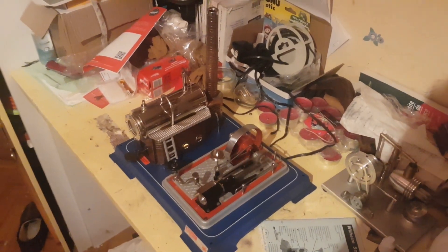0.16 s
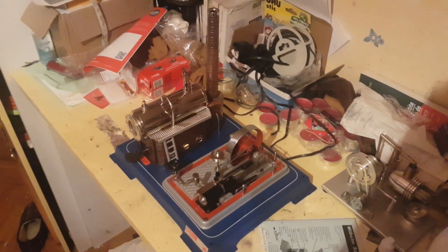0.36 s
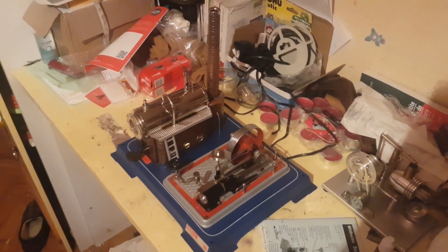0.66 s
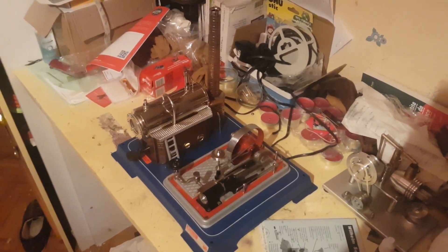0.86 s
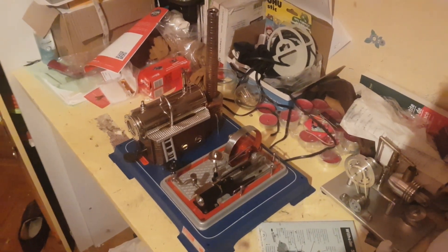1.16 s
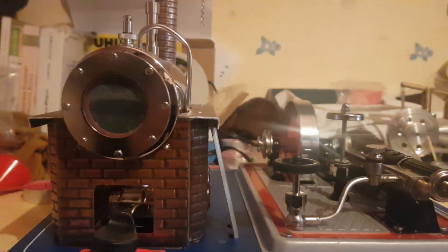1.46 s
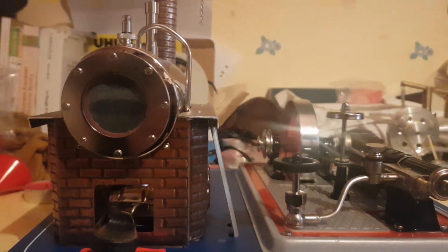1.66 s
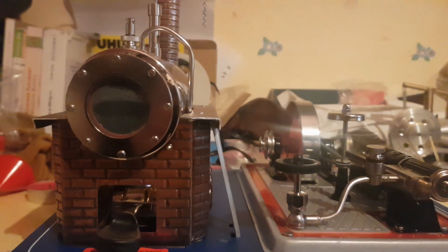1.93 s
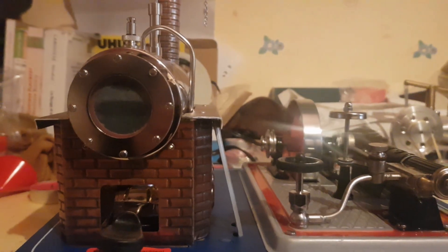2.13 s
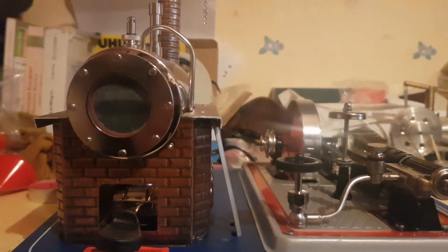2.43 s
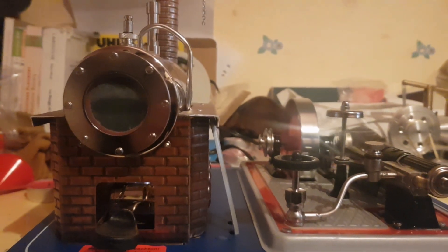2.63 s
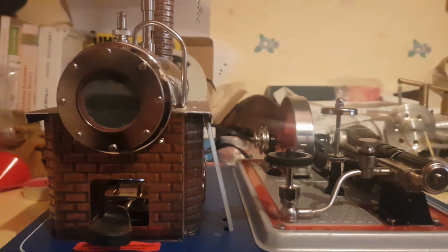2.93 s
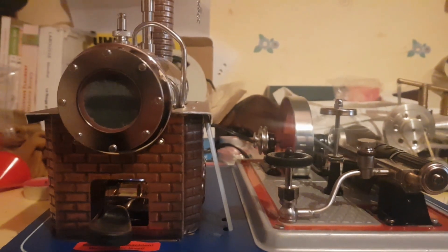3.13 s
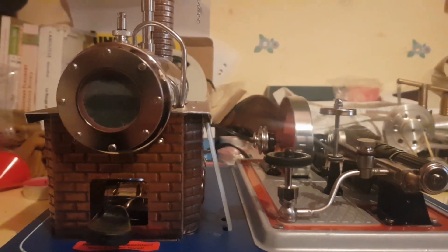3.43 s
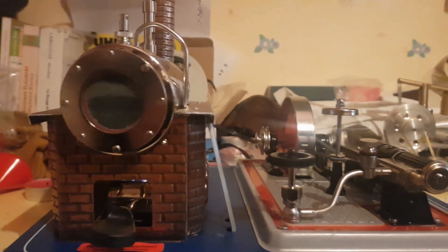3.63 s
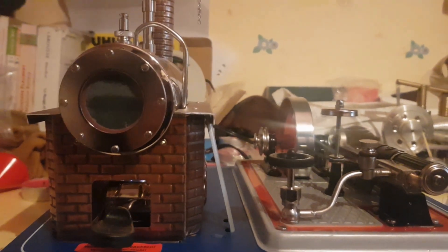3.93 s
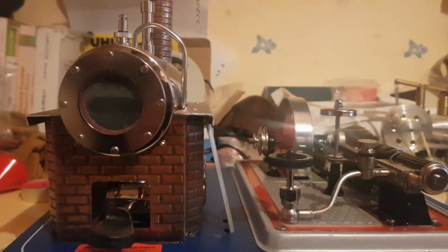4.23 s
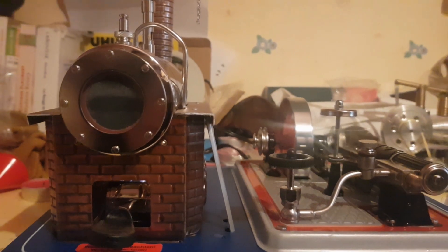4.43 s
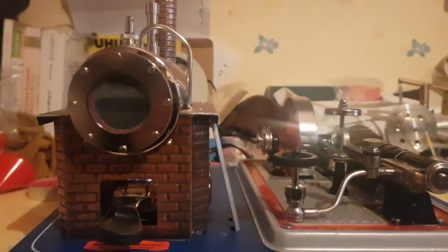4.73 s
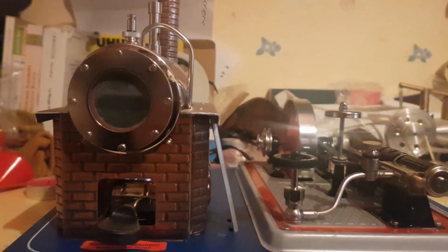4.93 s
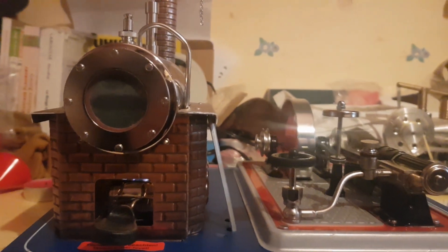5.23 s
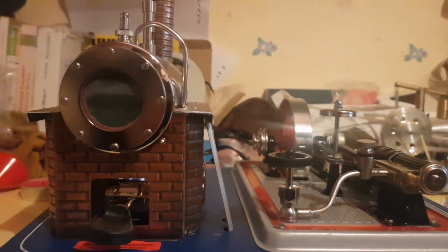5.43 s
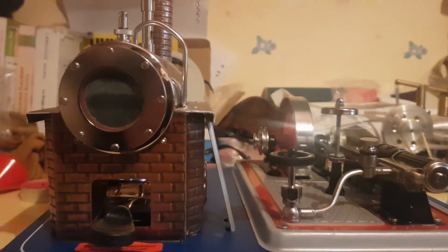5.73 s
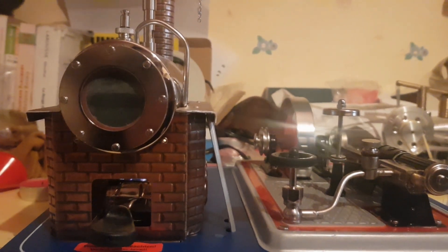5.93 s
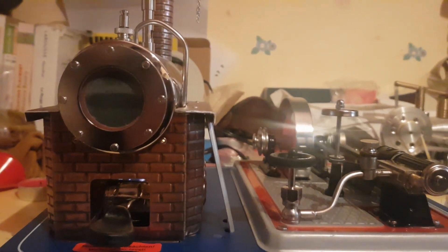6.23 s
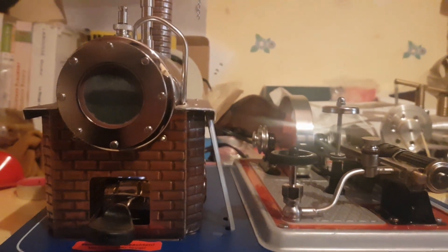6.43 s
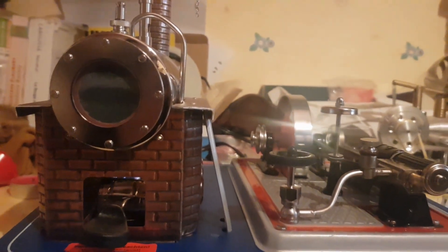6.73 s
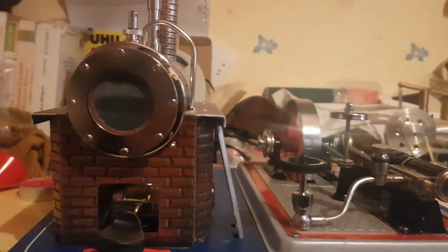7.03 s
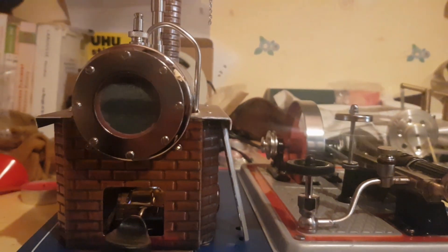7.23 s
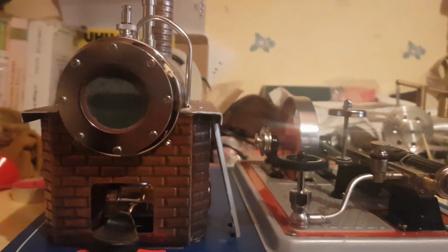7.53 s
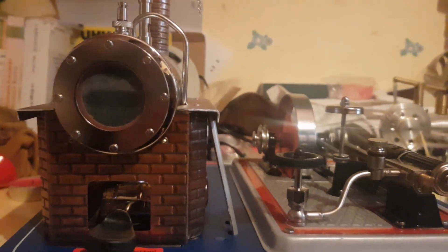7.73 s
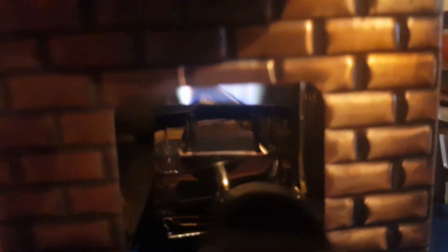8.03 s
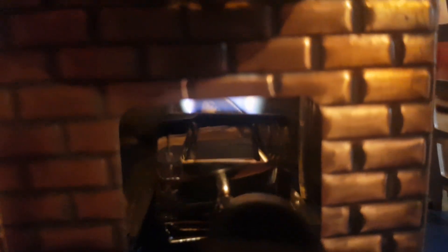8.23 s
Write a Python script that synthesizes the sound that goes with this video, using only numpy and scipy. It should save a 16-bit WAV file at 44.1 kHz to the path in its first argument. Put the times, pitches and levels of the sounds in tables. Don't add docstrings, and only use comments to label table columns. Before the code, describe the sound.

A tabletop model steam engine runs fast and steadily in a room, about thirty-two turns a second, its metallic rattle and soft steam hiss fused into a buzzing purr over a pulsing low throb. The view changes at about one and a half seconds; later a hand rubs and bumps the near microphone, dulling the clatter. A hard thump dips the level, then a click opens a louder close-up. Sound leans strongly left.

```python
import sys
import numpy as np
from scipy import signal
from scipy.fft import rfft, irfft, next_fast_len
from scipy.io import wavfile
from scipy.ndimage import uniform_filter1d, map_coordinates

SR = 44100
rng = np.random.default_rng(int(sys.argv[2]) if len(sys.argv) > 2 else 0)


def amplitude_ratio(level_db):
    exponent = np.asarray(level_db, float) / 20
    return 10 ** exponent


def unload_audio(sound):
    columns = np.transpose(np.atleast_2d(sound))
    steps = np.round(np.clip(columns, -1, 1) * 32767)
    wavfile.write(sys.argv[1], SR, steps.astype(np.int16))


N = 368667
DUCK_END_S = 7.816


def unit(x):
    return x / np.sqrt(np.mean(x ** 2) + 1e-20)


def along(points, hz):
    point_hz, value = np.transpose(points)
    return np.interp(np.log(hz + 1), np.log(point_hz + 1), value)


def curve(points, t):
    point_s, value = np.transpose(points)
    return np.interp(t, point_s, value)


def wobble(n, rate):
    knots = rng.standard_normal(int(n / SR * 100) + 4)
    return map_coordinates(knots, [np.arange(n) * rate / SR])


def filtered(x, response):
    n = x.shape[-1]
    m = next_fast_len(n + SR // 4)
    return irfft(rfft(x, m) * response(np.fft.rfftfreq(m, 1 / SR)), m)[..., :n]


def noise_pair(n):
    return rng.standard_normal((2, n))


def engine(view):
    # fade-in start, full level, fade-out start and silence, all in seconds.
    cuts = [
        (-1, -2.1, 1.448, 1.458),
        (1.27, 1.48, 7.814, 7.816),
        (7.816, 7.5, 9, 9.1),
    ]
    # reference time in seconds, phase there in turns, speed in Hz, speed gain in Hz per second.
    crank = [
        (0, .753, 31.068, .334),
        (1.36, .171, 32.3026, .0614),
        (7.8, .115, 32.168, 0),
    ]
    # hum in dB, clatter in dB, clatter left-right in dB, steam in dB, steam left-right in dB.
    positions = [
        (-27, -34.5, 22, -45, 28),
        (-25.5, -35.5, 15.5, -57.5, 15.5),
        (-22.5, -26.5, 14.5, -46.5, 7.5),
    ]
    # time in seconds, level in dB.
    flow = [(0, -3.5), (.12, 1.5), (1.4, -1.5), (1.5, -0.5), (3.3, 2), (4, -0.8), (4.5, 0.5), (7.8, 0.5)]
    # time in seconds, clatter gain in dB.
    cover = [(4.74, 0), (4.8, 3.5), (4.87, 3), (4.95, -1), (5.56, -4), (5.73, -5), (6.38, -8), (6.94, -7),
             (7.52, -8.5), (7.8, -10)]
    # frequency in Hz, level in dB per Hz.
    rumble_tone = [(15, -49), (25, -27), (93, -3.5), (236, -1.5), (287, -0.5), (395, -15.5), (487, 0),
                   (592, -10.5), (700, -8), (910, -41.5), (1540, -120)]

    t_in, t_full, t_out, t_gone = cuts[view]
    start, stop = max(round(t_in * SR), 0), min(round(t_gone * SR), N)
    t = np.arange(start, stop) / SR
    from_s, first, speed_hz, gain_hz = crank[view]
    since = t - from_s
    turns = first + speed_hz * since + gain_hz / 2 * since ** 2 + 10
    hum_db, clatter_db, clatter_pan_db, steam_db, steam_pan_db = positions[view]

    near_hand = (view == 1) * np.array([[1], [0]])
    cover_db = curve(cover, t) * near_hand
    rumble = unit(filtered(noise_pair(len(t)), lambda hz: amplitude_ratio(along(rumble_tone, hz))))
    base = hum(turns, view) * [[1], [0]] + amplitude_ratio(-6.5 + 1.64 * wobble(len(t), 8)) * rumble
    rattle_db = clatter_db + 0.4 * wobble(len(t), 9)
    hiss_db = steam_db + curve(flow, t) + 1.1 * wobble(len(t), 13)
    metal_noise = set_level(two_ports(clatter(turns, view), view), rattle_db, clatter_pan_db)
    hiss = set_level(two_ports(steam(turns, view), view), hiss_db, steam_pan_db)

    sound = amplitude_ratio(hum_db + 0.67 * cover_db) * two_ports(base, view)
    sound += amplitude_ratio(cover_db) * metal_noise
    sound += amplitude_ratio(0.96 * cover_db + palm(t) * near_hand) * hiss
    fade = np.interp(t, [t_in, t_full, t_out, t_gone], [0, 1, 1, 0])
    out = np.zeros((2, N))
    out[:, start:stop] = sound * amplitude_ratio(ducking(t)) * fade
    return out


def clatter(turns, view):
    # frequency in Hz, width in Hz, level in dB.
    metal = [
        [(790, 63, -2.5), (1080, 48, -2.5), (1360, 75, -11.5), (1730, 70, -8.5), (2240, 48, 2),
         (2735, 74, -1.5), (3080, 52, -5.5), (4640, 32, -10.5), (4825, 34, -11)],
        [(715, 48, -3), (817, 62, -7), (1081, 33, 0), (1340, 89, -10), (1608, 18, -6), (1935, 44.5, -0.5),
         (2218, 109, -6), (2710, 73, -4.5), (3110, 100, -15.5), (3348, 50, -17.5), (4500, 84, -35)],
        [(653, 59, 1), (1138, 75, -0.5), (1372, 53, 1.5), (1780, 130, -6.5), (2283, 92, 0.5), (2720, 120, -6),
         (3540, 59, -16.5), (4350, 150, -18)],
    ]
    # frequency in Hz, level in dB per Hz.
    scrape_tone = [
        [(400, -48), (600, -3.5), (900, -3), (1800, 6.5), (2050, -5), (2600, -16.5), (3200, -12), (3600, -12),
         (5000, -15.5), (6500, -21.5), (8000, -31), (10000, -63)],
        [(400, -34.5), (600, 0.5), (900, 0.5), (1500, -3.5), (2500, -6), (3300, -16.5), (3600, -19),
         (5000, -25), (6300, -33), (6900, -47.5), (8000, -56), (10000, -88)],
        [(400, -35), (600, -3), (1100, 5), (2000, 0), (2600, -1), (3300, -10), (4400, -19), (5500, -19.5),
         (6500, -28), (7200, -48), (8000, -42), (10000, -77.5)],
    ]

    knock_scrape, knock = rattle(turns, column=1, decay=0.29, blow_db=-0.5)
    tick_scrape, tick = rattle(turns, column=2, decay=0.088, blow_db=4.0)
    puffs = gate(turns, column=3, decay=0.1, scatter_db=4, steady_db=-17)
    exhaust = unit(puffs * noise_pair(len(turns)))

    def modes(hz):
        total = 0
        for k, (center, width, db) in enumerate(metal[view]):
            damping = 1j * hz * width
            total = total + (-1) ** k * amplitude_ratio(db) * damping / (center ** 2 - hz ** 2 + damping)
        return amplitude_ratio(3.0) * total * (hz > 500) / (1 + (hz / 5200) ** 8)

    ringing = filtered(crossover(knock, tick, 1630), modes)
    low_scrape = crossover(knock_scrape, tick_scrape, 1500)
    scrape = crossover(low_scrape, (exhaust + tick_scrape) / np.sqrt(2), 3600)
    return ringing + filtered(scrape, lambda hz: amplitude_ratio(along(scrape_tone[view], hz) - 6.5))


def crossover(low, high, edge_hz):
    below = lambda hz: 1 / (1 + (hz / edge_hz) ** 6)
    return filtered(low, lambda hz: np.sqrt(below(hz))) + filtered(high, lambda hz: np.sqrt(1 - below(hz)))


def rattle(turns, column, decay, blow_db):
    envelope = gate(turns, column, decay, scatter_db=1.2, steady_db=-8.5)
    blows = np.maximum(np.diff(envelope, prepend=envelope[0]), 0)
    age = np.arange(SR // 40) / SR
    steps = rfft(rng.standard_normal(len(age)) * np.exp(-age / 0.005))
    seating = irfft(steps / np.abs(steps))
    chatter = unit(uniform_filter1d(envelope, size=130) * rng.standard_normal((2, 2, len(turns))))
    impact = unit(signal.fftconvolve(blows, seating)[:len(turns)])
    return chatter[0], unit(chatter[1] + amplitude_ratio(blow_db) * impact)


def gate(turns, column, decay, scatter_db, steady_db):
    # phase in turns, frame knock in dB, rod tick in dB, steam puff in dB.
    contacts = [
        (.01, -10, -9, 0),
        (.1, -2, -4, -4),
        (.28, 0, -1, -3),
        (.38, -4, 0, -9),
        (.5, -4, -4, -3),
        (.62, -3, -6, -7),
        (.86, -8, -6, -14),
    ]
    luck = rng.standard_normal((int(turns.max()) + 3, len(contacts), 2))
    power = np.full(len(turns), amplitude_ratio(steady_db) ** 2)
    for k, row in enumerate(contacts):
        since = turns + 1 - row[0]
        which = since.astype(int)
        age = np.maximum(since - which - 0.004 * np.abs(luck[which, k, 1]), 0)
        strength = amplitude_ratio(row[column] + scatter_db * luck[which, k, 0])
        power += (age > 0) * strength ** 2 * np.exp(-age / decay)
    return np.sqrt(power)


def hum(turns, view):
    # level in dB of shaft orders 1, 2, 3 and so on.
    order_db = [
        [-22, -12, -7, -1.5, -11.5, -17.5, 1.5, -36, -4, -5, -9, -40, -30, -40, -0.5, -51, -35, -41, -35, -11,
         -17.5, -15, -31, -8.5, -33, -7.5, -39, -31, -25, -27, -25, -35, -21, -16, -20],
        [-27.5, -9.5, -2.5, -16, -13.5, -2.5, -4, -6.5, 4.5, -6.5, -9.5, -16, -13.5, -10, 2.5, -3.5, -9.5,
         -42.5, -23, -23.5, -42.5, -11.5, -32.5, -11.5, -16, -15.5, -35, -34, -30.5, -17, -29.5, -29, -15,
         -16.5, -10.5],
        [-16.5, -14.5, 1, -15, -39, -25, -33, -17, 3.5, -27, -5, -5.5, -10.5, 2.5, 5.5, -3.5, -2, -16, -9.5,
         -26, -19, -7.5, -8, -7, -27, -18, -9.5, -22, -19, -6, -3.5, -3, -16, -8, -3.5],
    ]
    arrival = [
        [(6, 0.3495), (9, 0.799), (15, 0.4374), (33, 0.398)],
        [(6, 0.6782), (9, 0.655), (15, 0.516), (33, 0.3576)],
        [(6, 0.614), (9, 0.706), (15, 0.525), (33, 0.369)],
    ]
    levels = order_db[view]
    orders = np.arange(len(levels)) + 1
    lags = np.cumsum(along(arrival[view], orders))
    lags = lags + 0.076 * rng.standard_normal(len(levels))
    n = len(turns)
    total = np.zeros(n)
    for order, db, lag in zip(orders, levels, lags):
        drift = 0.025 * order / 10 * wobble(n, 25)
        total += amplitude_ratio(db + 0.39 * wobble(n, 12)) * np.cos(2 * np.pi * (order * turns - lag + drift))
    return unit(total)


def steam(turns, view):
    # frequency in Hz, level in dB per Hz.
    hiss_tone = [
        [(4120, -30), (7000, -12.5), (8460, -15), (10200, -6), (12200, 0.5), (14200, -1), (15600, -7.5),
         (16200, -25)],
        [(4120, -43.5), (7000, -17), (8520, -15), (9740, -4.5), (11500, 2), (14800, 7), (15600, 4),
         (16200, -37)],
        [(4120, -52), (7000, -22), (7620, -11), (8370, -15.5), (10200, -1.5), (13600, 2.5), (15300, 7),
         (16200, -39)],
    ]
    puffs = noise_pair(len(turns)) * gate(turns, column=3, decay=0.11, scatter_db=2.5, steady_db=-20)
    return filtered(puffs, lambda hz: amplitude_ratio(along(hiss_tone[view], hz)))


def two_ports(pair, view):
    # frequency in Hz, left-right difference in dB.
    shadow = [
        [(60, 6), (110, 2), (200, 5), (380, 6.5), (700, 14), (1290, 21), (2380, 30), (4400, 28), (8120, 71),
         (15000, -29.5)],
        [(60, 6), (110, 2.5), (200, 14.5), (380, 8.5), (700, 14.5), (1290, 19.5), (2380, 14.5), (4400, 9),
         (8120, -1.5), (15000, -1)],
        [(60, 1), (110, 9), (200, 21.5), (380, 6.5), (700, 17), (1290, 23), (2380, 16), (4400, 14), (8120, 5.5),
         (15000, 2)],
    ]
    # frequency in Hz, common share from 0 to 1.
    alike = [(30, .3), (80, .75), (150, .93), (400, .93), (700, .8), (1400, .82), (2800, .85), (4500, .3),
             (15000, .1)]
    lag_s = [0.0003, 0.00018, -0.00024]
    share = lambda hz: np.clip(along(alike, hz), 0, 1)
    far = lambda hz: amplitude_ratio(-along(shadow[view], hz))
    late = lambda hz: np.exp(-2j * np.pi * hz * lag_s[view])
    common = filtered(pair[0], lambda hz: far(hz) * share(hz) * late(hz))
    own = filtered(pair[1], lambda hz: far(hz) * np.sqrt(1 - share(hz) ** 2))
    return np.array([pair[0], common + own])


def set_level(stereo, mid_db, pan_db):
    far = amplitude_ratio(-pan_db)
    even = np.array([unit(row) for row in stereo])
    return even * [[1], [far]] * amplitude_ratio(mid_db) * 2 / np.sqrt(1 + far ** 2)


def palm(t):
    touch_s, nearing_s = 4.828, 0.15
    return np.where(t < touch_s, 8 * np.exp(-np.abs(t - touch_s) / nearing_s), -8.5)


def ducking(t):
    thump_s, fall_s = 7.04, 0.021
    return -5 * np.clip((t - thump_s) / fall_s, 0, 1) * (t < DUCK_END_S)


def throb():
    # start in seconds, level in dB.
    laps = [(0, -31.5), (.2, -45), (.53, -40), (.86, -30), (1.23, -43), (1.47, -28.5), (1.9, -29),
            (2.31, -32), (2.63, -37), (2.94, -30), (3.29, -27.5), (3.69, -28.5), (4.1, -30), (4.47, -31),
            (4.77, -33), (5.11, -28.5), (5.5, -32.5), (5.85, -29.5), (6.23, -30.5), (6.57, -34),
            (6.88, -32), (7.19, -36), (7.57, -39), (7.85, -28.5), (8.19, -27.5)]
    table_hz, sag_hz, swell_s = 127, 5.1, 0.073
    tone, age = np.zeros(N + SR), np.arange(SR // 2) / SR
    shake = 0.5 * wobble(N + SR, 15)
    swell = (age / swell_s) ** 1.33 * np.exp(1.33 * (1 - age / swell_s))
    for k, (s, db) in enumerate(laps):
        at = round(s * SR)
        span = slice(at, at + len(age))
        cycles = table_hz * (s + age) - sag_hz * swell_s * np.exp(-age / swell_s)
        tone[span] += (-1) ** k * amplitude_ratio(db + 3) * swell * np.sin(2 * np.pi * cycles + shake[span])
    return tone[:N] * amplitude_ratio([[1.5], [-3]])


def hand():
    # time in seconds, level in dB.
    rub_level = [(4.7, -98), (4.9, -49), (5.51, -41), (6.3, -38), (8.0, -37.5), (8.05, -90)]
    # frequency in Hz, level in dB per Hz.
    rub_tone = [(20, -3), (45, 20.5), (65, 23), (100, 20), (160, 9), (300, -52)]
    # start in seconds, peak in dB, start pitch in Hz, end pitch in Hz, rise in seconds.
    bumps = [
        (7.033, -.9, 175, 65, .006),
        (7.0915, -13, 90, 62, .009),
        (4.795, -22, 90, 50, .012),
    ]
    # start in seconds, peak in dB, pitch in Hz.
    nudges = [(5.378, -36, 67.6), (5.449, -42, 83.4), (5.669, -28, 70.0), (5.769, -22, 48.3),
              (5.839, -22, 83.4), (5.919, -29, 83.4), (6.15, -24, 91), (6.239, -18, 70.0), (6.298, -22, 92),
              (6.429, -24, 93), (6.529, -20.5, 67.3), (6.649, -19, 59.2), (6.799, -33, 56.4),
              (6.919, -26, 61.9), (7.429, -23, 37.7), (7.568, -23, 64.6), (7.629, -30, 99.6),
              (7.699, -25, 86.1), (7.929, -23, 53.8)]
    # start in seconds, level in dB, decay in seconds.
    scuffs = [(4.787, -42, 0.018), (4.81, -37.5, 0.019), (4.845, -41, 0.022)]
    # frequency in Hz, level in dB per Hz.
    scuff_tone = [(200, -17), (1500, -13.5), (3500, 0), (6000, -10.5), (8000, -26), (12000, -19.5),
                  (16000, -28)]

    t, age = np.arange(N) / SR, np.arange(SR // 5) / SR
    rub = filtered(rng.standard_normal(N), lambda hz: amplitude_ratio(along(rub_tone, hz)))
    near = amplitude_ratio(curve(rub_level, t) + 10) * unit(amplitude_ratio(3.0 * wobble(N, 22)) * rub)
    pushes = [(s, db + 2, 1.28 * hz, 0.99 * hz, 0.012) for s, db, hz in nudges]
    for s, db, start_hz, end_hz, rise in [*bumps, *pushes]:
        pitch = end_hz + (start_hz - end_hz) * np.exp(-age / 0.008)
        pulse = age / rise * np.exp(1 - age / rise)
        swing = np.sin(2 * np.pi * np.cumsum(pitch) / SR - 0.4)
        near[round(s * SR):][:len(age)] += amplitude_ratio(db) * pulse * swing
    slide = sum(amplitude_ratio(db) * (t > s) * np.exp(-np.abs(t - s) / decay) for s, db, decay in scuffs)
    near += slide * unit(filtered(rng.standard_normal(N), lambda hz: amplitude_ratio(along(scuff_tone, hz))))
    return near * amplitude_ratio([[0], [-45]])


def splice():
    age = np.arange(N) / SR - 7.8181
    return (age > 0) * np.exp(-np.abs(age) / 0.00026) * amplitude_ratio([[-6], [-18]])


def scene():
    return sum(engine(view) for view in range(3)) + throb() + hand() + splice()


def top_cut(x):
    return signal.sosfilt(signal.butter(12, 16480, fs=SR, output="sos"), x)


def record(dry):
    # frequency in Hz, level in dB per Hz.
    self_noise = [(1000, -17.5), (3500, 5.5), (6000, -10), (7000, -31.5), (9000, -34.5), (10500, -10.5),
                  (14000, -3), (16000, -7)]
    hiss = unit(filtered(noise_pair(N), lambda hz: amplitude_ratio(along(self_noise, hz))))
    t = np.arange(N) / SR
    gain_db = ducking(t) - 9 * (t >= DUCK_END_S)
    capped = np.clip(dry + amplitude_ratio(-65.5 + gain_db) * hiss, -0.985, 0.985)
    narrow = filtered(capped, lambda hz: hz < 15880)
    return top_cut(narrow)


dry = scene()
out = record(dry)
unload_audio(out)
```